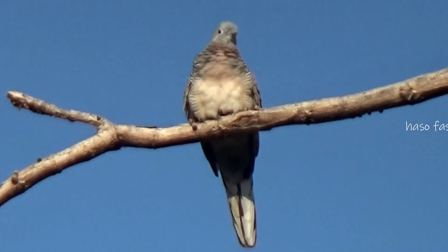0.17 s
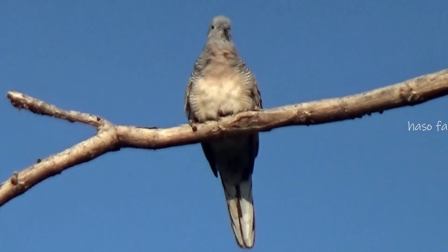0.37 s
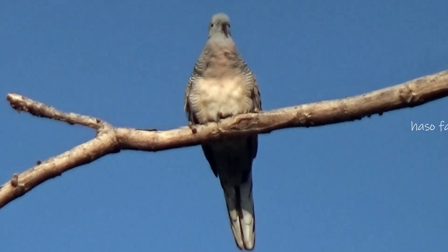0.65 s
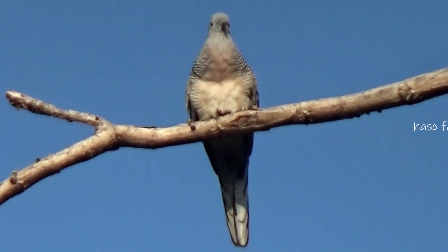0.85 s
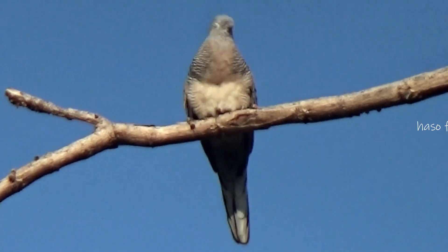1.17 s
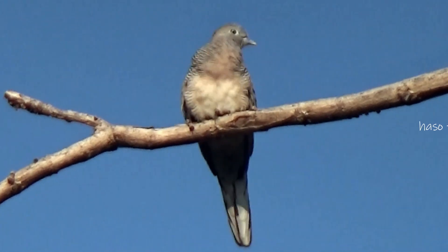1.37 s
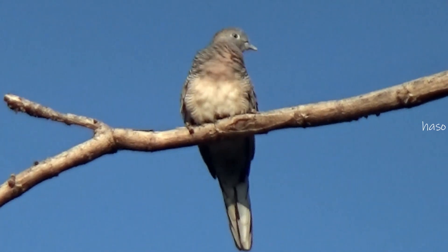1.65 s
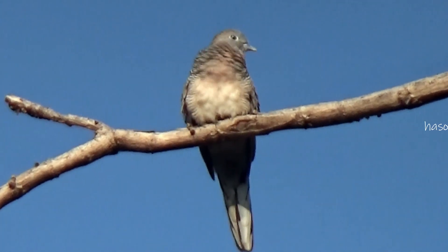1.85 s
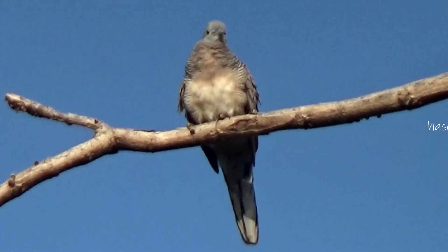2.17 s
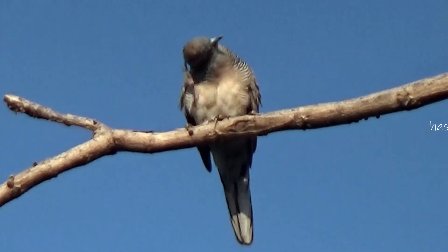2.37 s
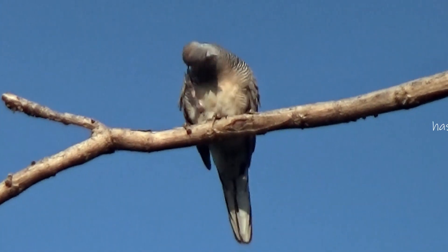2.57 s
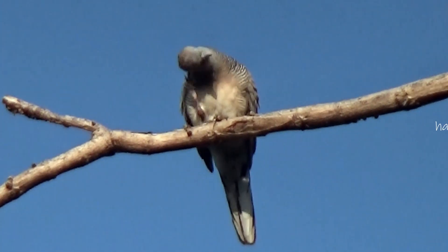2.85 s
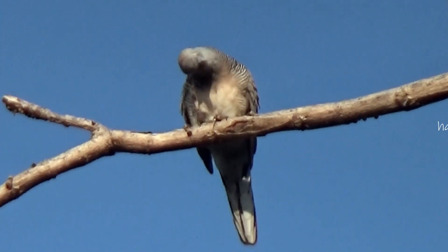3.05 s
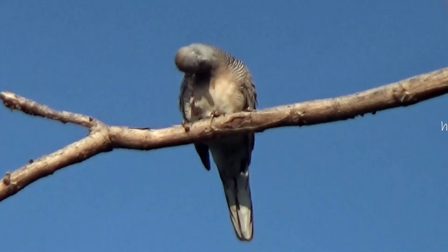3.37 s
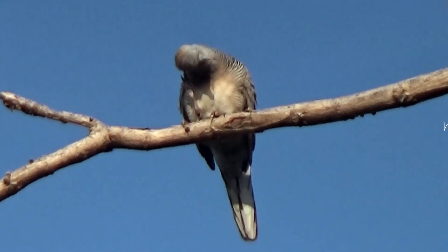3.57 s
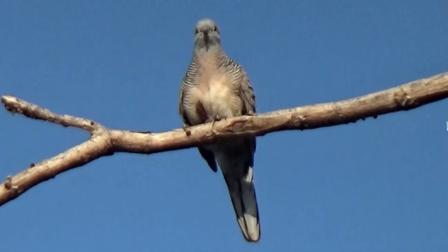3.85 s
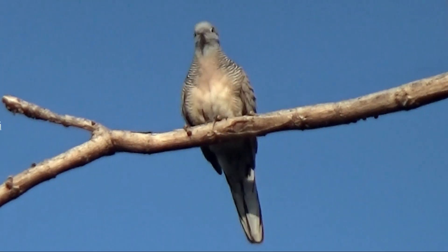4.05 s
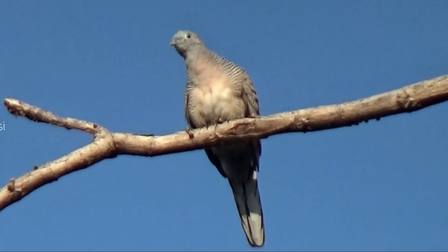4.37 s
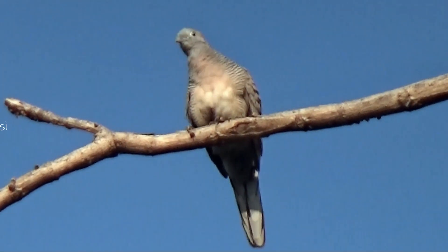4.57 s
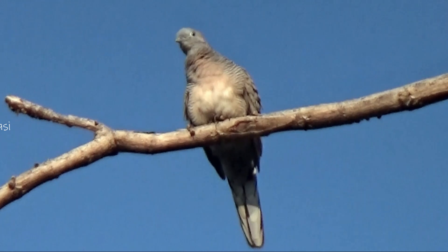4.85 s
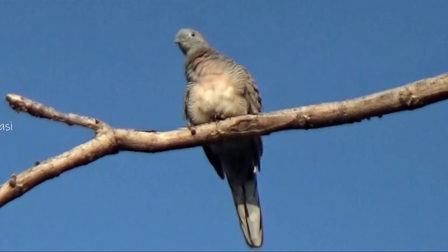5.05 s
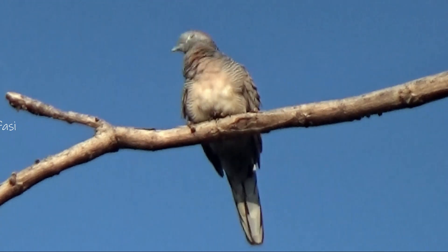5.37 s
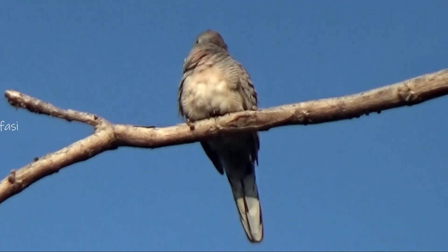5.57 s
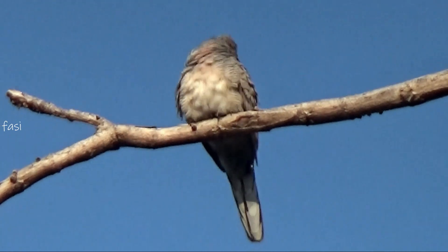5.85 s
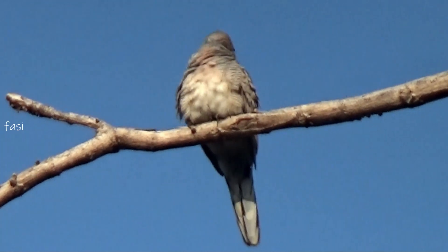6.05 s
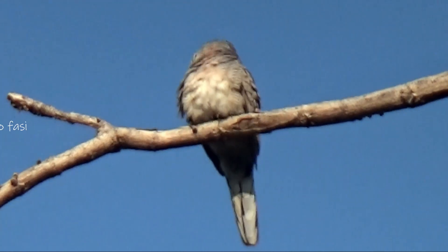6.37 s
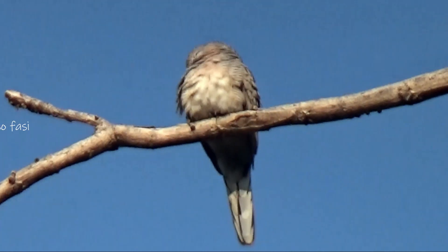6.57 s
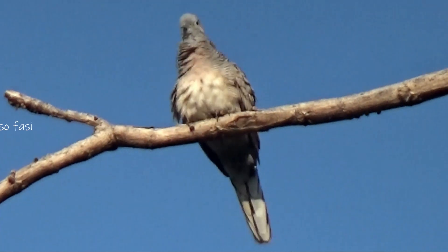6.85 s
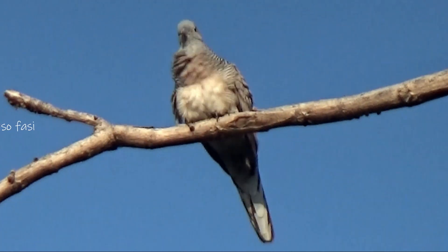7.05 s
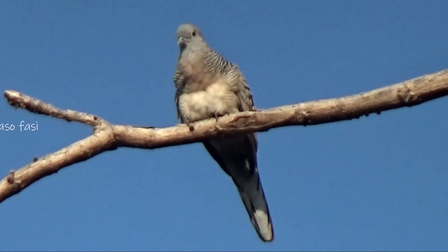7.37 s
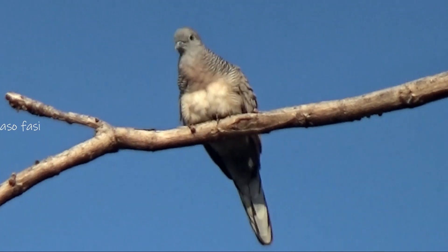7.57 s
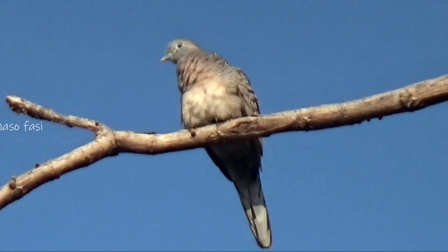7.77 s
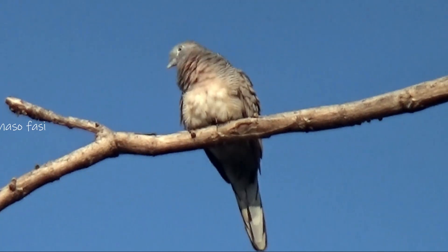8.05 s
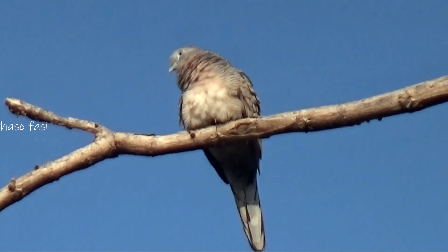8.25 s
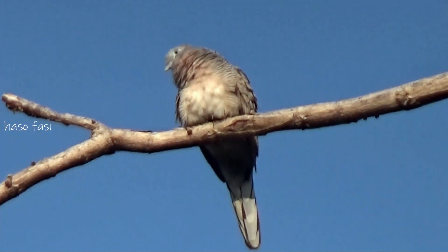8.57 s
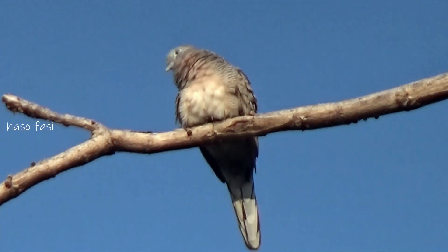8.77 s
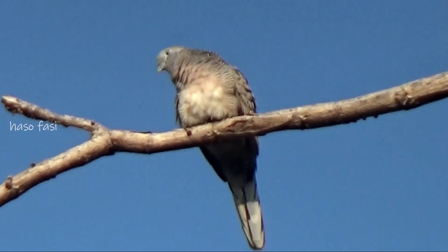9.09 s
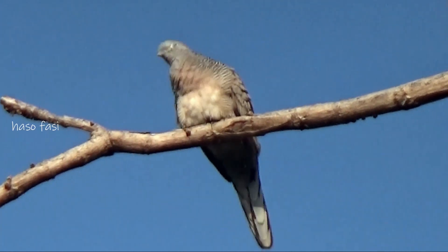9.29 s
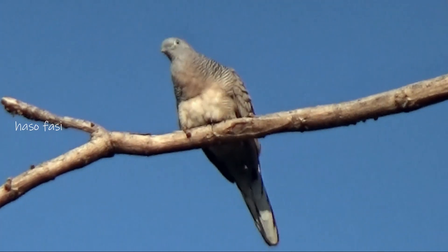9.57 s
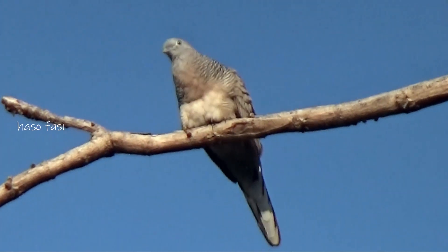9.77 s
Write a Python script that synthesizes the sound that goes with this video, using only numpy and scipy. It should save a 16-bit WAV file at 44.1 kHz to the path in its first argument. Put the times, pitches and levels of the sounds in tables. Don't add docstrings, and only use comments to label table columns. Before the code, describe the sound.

An outdoor morning-like ambience: low, soft traffic rumble, a faint engine hum and a hazy treble of distant flock twitter throughout. Hoarse, breathy nestling rasps repeat several times a second, weaker around 5.5-6.5 s and stronger after 7. At 0.7 s a close dove gives a dry, hollow, trilled coo of nine rapid puffs around 1-1.3 kHz, slowing and sinking into a longer last note, about half a second in all. Sharp 7 kHz bird chips pepper the whole scene, with a falling slide at 2.3 and a rising one at 6.1. Weak far barks come near 2.7 and 3.2. A distant dove answers at 5.7, softly echoed. The near dove repeats at 7.0; a bright far yap and faint cock crow follow around 7.5-8.5. Four arched chirps run from 7.9 to 8.9 over the second far answer at 8.0. The third near coo comes at 9.2, with a faint gliding song until the end.

```python
import sys
import numpy as np
from scipy import signal
from scipy.fft import rfft, irfft
from scipy.io import wavfile
from scipy.ndimage import uniform_filter1d

SR = 44100
rng = np.random.default_rng(int(sys.argv[2]) if len(sys.argv) > 2 else 0)


def inscribe(sig):
    pcm = np.round(np.clip(np.atleast_2d(sig).T, -1, 1) * 32767)
    wavfile.write(sys.argv[1], SR, pcm.astype(np.int16))


def natural_amplitude(level_db):
    exponent = np.asarray(level_db, float) / 20
    return 10 ** exponent


N = 437472

# frequency in Hz, density in dB per Hz.
AIR_SPECTRUM = [(18, -54), (30, 2.5), (127, 0), (263, -8.5), (481, -12), (877, -12.5), (1370, -16),
                (2370, -17.5), (3330, -11.5), (3900, -13), (5920, -18), (6750, -22), (9000, -22.5),
                (12500, -36), (15600, -36)]
AIR_DB = -42.5
# time in seconds, level in dB.
FLOCK_SWELL = [(0.0, -43.5), (0.38, -43), (0.72, -43.5), (1.1, -45), (1.35, -44.5), (2.51, -43),
               (2.68, -46.5), (4.39, -42.5), (5.14, -48), (6.66, -43.5), (6.9, -40.5), (8.07, -40.5),
               (8.56, -41.5), (9.92, -42)]
# pitch in Hz, width in Hz, level in dB.
ENGINE = (133, 3.5, -54)
# frequency in Hz, left-right likeness from 0 to 1.
LIKENESS = [(60, .999), (125, 1), (250, 0.9), (700, 0.32), (2000, 0.61), (4000, 0.84), (8000, 0.96),
            (12000, .999)]
# frequency in Hz, time to die by 60 dB in seconds.
TREE_DECAY = [(800, 0.39), (3000, 0.22), (7000, 0.26), (12000, 0.038)]

# start in seconds, level in dB, throat in Hz, throat width in Hz, decay in seconds.
BARK_CALLS = [
    (2.694, -44, 820, 600, 0.1),
    (3.202, -47.5, 785, 600, 0.082),
    (6.322, -47.5, 1370, 350, 0.14),
    (6.604, -51, 420, 300, 0.12),
    (7.549, -39.5, 2020, 400, 0.037),
    (7.54, -41, 2700, 500, 0.066),
]
# time in seconds, frequency in Hz, level in dB.
COCK_CURVE = [
    (7.71, 710, -55),
    (7.726, 679.6, -55),
    (8.352, 602.4, -58.5),
    (8.58, 630, -61),
]
# start and length in seconds, level in dB, middle pitch and whole glide in Hz.
FAR_WHISTLES = [(0, 0.3, -50, 2620, -150), (1.618, 0.15, -52.5, 2180, -450), (2.159, 0.065, -52, 2387, -70),
                (2.419, 0.064, -50, 1270, 5), (2.494, 0.045, -66, 1250, -5), (2.39, .06, -51, 2665, -30),
                (2.725, 0.12, -50, 2524, -400), (4.05, 0.058, -52.5, 1150, -40),
                (4.797, 0.061, -54, 2370, 15), (4.953, 0.25, -55, 2250, 17), (6.465, 0.036, -48, 1420, 50),
                (6.617, 0.047, -48, 1345, -110), (8.333, 0.14, -40, 3294, -150),
                (6.232, 0.036, -47, 4330, 0), (8.79, 0.079, -44, 2800, 38),
                (8.939, 0.073, -39.5, 3050, 100)]
# time in seconds, pitch in Hz, level in dB.
FAR_SONG = [(9.26, 2670, -40), (9.31, 2740, -48), (9.38, 3020, -48.5), (9.47, 2980, -48), (9.55, 2760, -57),
            (9.62, 2795, -47), (9.76, 2710, -48), (9.82, 2660, -58), (9.9, 2590, -48)]

# time in seconds, pitch in Hz, level in dB.
SLIDE_CURVES = [
    [(2.251, 8860, -31), (2.258, 7630, -34), (2.284, 6540, -28.5), (2.305, 6100, -39), (2.335, 5200, -50)],
    [(3.872, 7600, -36), (3.884, 6850, -35), (3.945, 4900, -50)],
    [(6.085, 4780, -44), (6.118, 4750, -47), (6.136, 5020, -36), (6.19, 6390, -32.5), (6.222, 7280, -30),
     (6.242, 7550, -43.5)],
    [(6.128, 7430, -41), (6.15, 7250, -52), (6.18, 6950, -42)],
    [(6.408, 7360, -41), (6.44, 7180, -44), (6.47, 7080, -55)],
]
# start in seconds, peak in dB, pitch in Hz, level change per flick in dB.
CHIP_CALLS = [(0.676, -25, 7260, -4.5), (0.8706, -29, 7400, 3), (0.9857, -22.5, 7200, -7),
              (1.2688, -21.5, 7320, -7), (1.91, -25.5, 7040, -1.5), (2.205, -28, 6560, -3),
              (2.501, -28.5, 7030, -4), (3.6614, -30, 6900, -4.5), (3.7976, -26.5, 7420, -7.5),
              (4.0603, -26.5, 6900, -6), (4.4209, -28.5, 7360, -2), (4.5176, -26, 7460, -4.5),
              (4.6877, -27.5, 7500, -6), (4.823, -29.5, 7620, -3.5), (5.3095, -30, 7560, -4),
              (5.7103, -34.5, 7600, 0), (5.961, -32, 7350, -1.5), (6.784, -30, 7440, -3.5),
              (7.187, -28.5, 7400, -6), (7.8826, -32.5, 7200, 1.2), (7.989, -34, 7750, -15),
              (8.001, -22.5, 7840, -10), (8.321, -27.5, 7020, -4.5), (8.593, -31, 6700, -0.6),
              (9.084, -29.5, 6680, 0.2), (9.485, -30.5, 6280, -3)]
CHIP_FALL, CHIP_DEPTH = .05, .26
CHIP_GAP_S = .0135
# start in seconds, level in dB, top pitch in Hz.
ARCH_CALLS = [
    (7.926, -22, 3850),
    (8.258, -22, 3735),
    (8.574, -21, 3690),
    (8.869, -19.5, 3655),
]
ARCH_RISE_S, ARCH_FALL_S = .031, .027
ARCH_START_HZ, ARCH_END_HZ, ARCH_EDGE_DB = 2620, 2834, -4.5

# middle in seconds, length in seconds, breath in dB.
HOARSE_CALLS = [(0.245, 0.14, -50.5), (0.382, 0.12, -45.5), (0.995, 0.089, -48), (1.446, 0.2, -52),
                (1.768, 0.15, -48), (2.322, 0.12, -48.5), (2.622, 0.057, -57), (2.91, 0.033, -58),
                (3.037, 0.067, -56.5), (3.15, 0.17, -53), (4.477, 0.17, -48.5), (4.903, 0.087, -51.5),
                (5.064, 0.099, -62), (5.23, .09, -59), (2.76, .05, -63.5), (3.277, .06, -60),
                (5.836, 0.075, -58), (5.963, 0.088, -60), (6.368, 0.068, -59), (6.712, 0.12, -48),
                (6.912, 0.25, -49.5), (7.093, 0.12, -44.5), (7.261, 0.16, -44), (7.477, 0.11, -45),
                (7.627, 0.099, -52.5), (7.744, 0.1, -44), (7.942, 0.12, -44.5), (8.304, 0.12, -45.5),
                (8.742, 0.095, -48.5), (8.859, 0.19, -50.5), (9.241, 0.13, -46.5), (9.51, 0.1, -45),
                (9.815, 0.12, -50.5)]
# middle in seconds, length in seconds, breath in dB.
BREATHY_CALLS = [(0.115, 0.097, -49.5), (0.552, 0.13, -46.5), (0.695, 0.048, -49.5), (0.812, 0.075, -53),
                 (0.894, 0.041, -54), (1.269, 0.2, -50), (1.61, 0.12, -50.5), (1.935, 0.16, -50),
                 (2.108, 0.15, -57), (2.23, 0.011, -62), (2.467, 0.094, -49.5), (3.38, 0.11, -52.5),
                 (3.627, 0.12, -56.5), (3.826, 0.12, -51), (4.075, 0.12, -51), (4.297, 0.09, -50),
                 (4.693, 0.071, -48), (5.442, 0.077, -50.5), (5.717, .071, -60), (6.155, 0.065, -57),
                 (6.587, 0.049, -59), (8.061, 0.13, -43.5), (8.49, 0.16, -47.5), (8.648, 0.086, -48.5),
                 (9.023, 0.093, -44.5), (9.657, 0.13, -46.5)]
HOARSE_VOICE_DB, BREATHY_VOICE_DB = 9, 8
RASP_HZ = 1922
# multiple of the pitch, level in dB.
RASP_PARTIALS = [(1, -8.5), (2, 3), (3, 5), (5, -23)]
# frequency in Hz, density in dB per Hz.
RASP_BREATH = [(940, -48), (1600, -11.5), (3020, -9.5), (3890, 0.5), (4570, -5.5), (5210, -1), (5720, -5.5),
               (7090, -16.5), (8390, -11), (10400, -11.5), (11900, -29), (15000, -38)]

# puff start in seconds, peak in dB.
FAR_DOVE_PUFFS = [
    [(5.703, -33), (5.73, -30.5), (5.773, -29.5), (5.803, -30.5), (5.84, -30.5), (5.888, -31.5),
     (5.95, -34), (6.037, -30.5)],
    [(8.018, -36.5), (8.044, -33), (8.086, -32), (8.13, -34), (8.175, -34.5), (8.226, -31.5), (8.308, -33),
     (8.424, -34.5)],
]
# puff length in seconds, start pitch in Hz, top pitch in Hz.
FAR_DOVE_SHAPE = [(0.03, 940, 1008), (0.026, 1160, 1230), (0.026, 1060, 1225), (0.031, 1070, 1228),
                  (0.033, 1020, 1195), (0.034, 965, 1168), (0.032, 964, 1130), (0.086, 985, 1160)]
FAR_SPAN_S = .37
HEDGE_S, HEDGE_DB = .04, -13
WALL_S, WALL_DB = .112, -19

# puff start in seconds, peak in dB.
DOVE_PUFFS = [
    [(0.664, -6), (0.688, -6), (0.72, -6.5), (0.751, -7), (0.7805, -7.5), (0.8252, -7.5), (0.888, -9),
     (0.963, -10), (1.056, -12)],
    [(7.008, -6), (7.031, -6.5), (7.069, -7.5), (7.1, -7.5), (7.132, -8.5), (7.182, -7.5), (7.244, -9.5),
     (7.323, -10), (7.418, -10.5)],
    [(9.244, -6), (9.267, -8), (9.3, -9.3), (9.332, -8.5), (9.3575, -7.5), (9.403, -9), (9.464, -9),
     (9.538, -8.5), (9.625, -10)],
]
# puff length in seconds, start pitch in Hz, top pitch in Hz.
DOVE_SHAPE = [
    (0.024, 925, 990),
    (0.03, 1225, 1320),
    (0.033, 1250, 1325),
    (0.0281, 1250, 1320),
    (0.0366, 1090, 1285),
    (0.033, 960, 1222),
    (0.027, 965, 1192),
    (0.031, 990, 1215),
    (0.1, 990, 1235),
]


def evened(x):
    return x / np.sqrt(np.mean(x ** 2) + 1e-20)


def read(points, hz):
    f, value = np.transpose(points)
    return np.interp(np.log(hz + 1), np.log(f + 1), value)


def add(mix, s, sound):
    part = mix[max(round(s * SR), 0):][:len(sound)]
    part += sound[:len(part)]


def wander(size, seconds):
    span = max(round(seconds * SR), 1)
    once = uniform_filter1d(rng.standard_normal(size), span)
    return evened(uniform_filter1d(once, span))


def sine(hz):
    return np.sin(2 * np.pi * np.cumsum(hz) / SR)


def resonate(x, hz, width):
    turn = np.exp(2j * np.pi * np.cumsum(hz * np.ones(len(x))) / SR)
    r = np.exp(-np.pi * width / SR)
    return 2 * (turn * signal.lfilter([1 - r], [1, -r], x / turn)).real


def hiss(spectrum, patchy_db):
    frames, hz = N // 256 + 5, np.fft.rfftfreq(1024, 1 / SR)
    a, b, c, d, patches = rng.standard_normal((frames, 513, 5)).T
    patches = evened(uniform_filter1d(uniform_filter1d(patches, 10, 0), 8, 1))
    mid = a + 1j * b
    width = np.sqrt((1 - np.clip(read(LIKENESS, hz), 0, 1)) / 2)
    side = width[:, None] * (c + 1j * d)
    gain = natural_amplitude(read(spectrum, hz)[:, None] + patchy_db * patches)
    z = np.array([mid + side, mid - side]) * gain
    return evened(signal.istft(z, nperseg=1024, noverlap=768)[1][:, :N])


def trees(x, wet_db):
    taps = np.zeros((2, SR // 2))
    at = np.arange(300, SR // 2 - 20, 20) + rng.integers(0, 20, (2, (SR // 2 - 301) // 20))
    np.put_along_axis(taps, at, rng.choice([-1., 1.], at.shape), 1)
    hz, t, z = signal.stft(taps, SR, nperseg=256)
    decay = natural_amplitude(-60 * t / read(TREE_DECAY, hz)[:, None])
    mid, side = signal.istft(z * decay, SR, nperseg=256)[1]
    tail = np.array([mid + 0.23 * side, mid - 0.3 * side]) / np.linalg.norm(mid)
    return x + natural_amplitude(wet_db) * signal.fftconvolve(x[None], tail, axes=1)[:, :N]


def traffic_and_flock():
    air = rfft(natural_amplitude(AIR_DB) * hiss(AIR_SPECTRUM, patchy_db=.7))
    hz = np.fft.rfftfreq(N, 1 / SR)
    high = 1 / (1 + (2750 / (hz + 1)) ** 12) / (1 + (hz / 9000) ** 4)
    swell_db = np.interp(np.arange(N) / SR, *np.transpose(FLOCK_SWELL)) + 47
    swell_db += 3.2 * wander(N, 0.043)
    return irfft(air * (1 - high), N) + natural_amplitude(swell_db) * irfft(air * high, N)


def engine_hum():
    hz, width, db = ENGINE
    return natural_amplitude(db) * evened(resonate(rng.standard_normal(N), hz, width))


def bark(s, db, hz, width, length):
    t = np.arange(0, 3 * length, 1 / SR)
    puff = rng.standard_normal(len(t))
    throat = resonate(resonate(puff, hz, width), hz, width)
    throat += 0.4 * resonate(puff, 1.49 * hz, width)
    return s, natural_amplitude(db) * evened(throat) * np.clip(t / 0.004, 0, 1) * np.exp(-t / length)


def crow(rows):
    s, hz, db = np.transpose(rows)
    t = np.arange(s[0], s[-1], 1 / SR)
    shaky_hz = np.interp(t, s, hz) * (1 + 0.0068 * wander(len(t), 0.0039))
    turns = np.pi * np.cumsum(shaky_hz) / SR
    edges = np.exp(-(t - s[0]) / 0.074)
    broken = np.clip(.6 + .45 * wander(len(t), .012), edges, 2)
    tone = np.sin(2 * turns) + edges * (1.4 * np.sin(turns) + 1.6 * np.sin(3 * turns))
    return s[0], natural_amplitude(np.interp(t, s, db) + 5.5) * broken * tone


def whistle(s, length, db, middle_hz, glide_hz, rough=0.6):
    u = np.arange(0, 1, 1 / SR / length)
    bend = .5 - .5 * np.cos(2 * np.pi * u)
    hz = middle_hz + np.where(u < .5, -glide_hz / 2, glide_hz / 2) * (1 - bend)
    hz = hz * (1 + 0.02 * rough * wander(len(u), 0.0035))
    level = natural_amplitude(db) * (1 + rough * wander(len(u), 0.011)) * signal.windows.tukey(len(u), .3)
    return s, level * sine(hz)


def slide(rows, flutter_s=0.0023):
    s, hz, db = np.transpose(rows)
    t = np.arange(s[0], s[-1], 1 / SR)
    flutter = np.clip(1 + .65 * wander(len(t), flutter_s), 0, 2)
    level = natural_amplitude(np.interp(t, s, db) + 3) * flutter * signal.windows.tukey(len(t), .1)
    return s[0], level * sine(uniform_filter1d(np.interp(t, s, hz), 250))


def chip(s, db, hz, change_db):
    t, out = np.arange(0, .007, 1 / SR), np.zeros(SR // 20)
    for k in range(3):
        arch = 1.02 - CHIP_DEPTH * (2 * t / t[-1] - .9) ** 2
        flick = np.sin(np.pi * (t / t[-1]) ** 0.66) * sine(hz * (1 - CHIP_FALL * k) * arch)
        click = resonate(resonate(rng.standard_normal(len(t)), 7500, 2400), 7500, 2400)
        click *= 0.92 * np.exp(-t / 0.0088)
        add(out, k * CHIP_GAP_S, natural_amplitude(db + change_db * k) * (flick + click))
    return s - .0015, out


def chirp(s, db, top_hz):
    t = np.arange(0, ARCH_RISE_S + ARCH_FALL_S, 1 / SR)
    corners = [0, ARCH_RISE_S, t[-1]]
    hz = np.interp(t, corners, [ARCH_START_HZ, 1.045 * top_hz, ARCH_END_HZ])
    hz = uniform_filter1d(hz, size=560, mode="nearest")
    level = natural_amplitude(db + np.interp(t, corners, [ARCH_EDGE_DB, 0, .15 * ARCH_EDGE_DB]))
    level *= 1 + 0.41 * wander(len(t), 0.0054)
    return s, level * signal.windows.tukey(len(t), .3) * sine(hz)


def nestlings():
    breath, voice, bend = np.zeros((3, N))
    calls = [(*row, HOARSE_VOICE_DB) for row in HOARSE_CALLS]
    calls += [(*row, BREATHY_VOICE_DB) for row in BREATHY_CALLS]
    for s, length, breath_db, voice_db in calls:
        u = np.linspace(0, 1, round(1.27 * length * SR))
        swell = np.clip(u / 0.28, 0, 1) ** 1.1 * np.clip((1 - u) / 0.37, 0, 1) ** 1.53
        add(breath, s - 0.61 * length, natural_amplitude(breath_db) * swell)
        add(voice, s - 0.68 * length, natural_amplitude(breath_db + voice_db) * swell ** 2)
        add(bend, s - 0.4 * length, swell * rng.normal(0.005, 0.018))
    hz = RASP_HZ * (1 + bend + .014 * wander(N, .015))
    grit = natural_amplitude(2.3 * wander(N, .0015))
    noise = rng.standard_normal(N)
    hoarse = np.zeros(N)
    for k, db in RASP_PARTIALS:
        hoarse += natural_amplitude(db) * evened(resonate(resonate(noise, k * hz, 260), k * hz, 340))
    air = natural_amplitude(10.0) * breath * hiss(RASP_BREATH, patchy_db=4.0)
    return grit * air + trees(natural_amplitude(-6.5) * grit * voice * evened(hoarse), wet_db=-0.5)


def coo(rows):
    t = np.arange(rows[0][0] - .03, rows[-1][0] + rows[-1][1] + .012, 1 / SR)
    hz = np.full(len(t), float(rows[0][3]))
    level, sputter, shut = np.zeros(len(t)), np.zeros(len(t)), -1
    following = [*rows[1:], [99] * 5]
    for k, ((s, length, db, low_hz, top_hz), (next_s, _, _, next_hz, _)) in enumerate(zip(rows, following)):
        joined, slurred, rested = next_hz > 1150, low_hz > 1150, s - shut > .015
        length = next_s - s if joined else min(length, next_s - s - .0015)
        u, left = t - s, s + length - t

        end_hz = next_hz if joined else (.95 - 1.2 * length) * top_hz
        rise_s = .004 + .05 * length + .003 * slurred
        rise = 1 - np.exp(-(np.maximum(u - .001 - .002 * rested, 0) / rise_s) ** 1.5)
        fall = np.exp(-np.maximum(left, 0) / (.003 if joined else .001 + .2 * length))
        arch = low_hz + (top_hz - low_hz) * rise - (top_hz - end_hz) * fall * rise
        hz = np.where(u > -.004 * rested, arch, hz)

        lap = (.0048 - 0.0019 * k - .0055) * joined
        opening = (u + 0.00055) / 0.007 if rested else (u + 0.0014 + 0.0045 * slurred) / 0.0067
        closing = (left + lap) / (.008 if joined else .004 + 0.16 * length)
        valve = (np.clip(opening, 0, 1) * np.clip(closing, 0, 1)) ** 0.64
        tilt_db = .9 if k == 1 else 0.5 * (not joined)
        level += valve * natural_amplitude(db - tilt_db * (2 * u / length - 1).clip(-1, 1))
        if rested:
            burst = np.clip((u + 0.017) / 0.0099, 0, 1) * np.clip(-u / 0.0036, 0, 1)
            sputter += burst * natural_amplitude(db - (14.0 if k == 0 else 17.0))
        shut = s + length

    level = uniform_filter1d(level, size=170)
    crop = .75 * np.exp(-((hz - 1010) / 70) ** 2) - .22 * np.exp(-((hz - 1120) / 35) ** 2)
    level *= 1 + crop * np.clip((t - rows[4][0] - .02) / .08, 0, 1)
    level *= 1 + 0.062 * wander(len(t), 0.0017)
    turns = 2 * np.pi * np.cumsum(hz * (1 + 0.0037 * wander(len(t), 0.0028))) / SR
    overtone = natural_amplitude(-36) * np.where(t > rows[-1][0] + .012, 1, .45) * np.sin(2 * turns)
    flaps = rng.standard_normal(len(t))
    for _ in range(4):
        flaps = evened(resonate(flaps, 982, 780))
    return t[0], level * (np.sin(turns) + overtone) + sputter * flaps


def phrase(puffs, shape, pace=1):
    rows = []
    for (s, db), (length, low_hz, top_hz) in zip(puffs, shape):
        rows.append((s, pace * length, db, low_hz, top_hz))
    return coo(rows)


def far_dove():
    answer = np.zeros(N)
    for puffs in FAR_DOVE_PUFFS:
        s, call = phrase(puffs, FAR_DOVE_SHAPE, (puffs[-1][0] - puffs[0][0]) / FAR_SPAN_S)
        add(answer, s, call)
        add(answer, s + HEDGE_S, natural_amplitude(HEDGE_DB) * call)
        add(answer, s + WALL_S, natural_amplitude(WALL_DB) * call)
    return resonate(answer, 1030, 460)


def near_dove():
    near = np.zeros(N)
    for puffs in DOVE_PUFFS:
        add(near, *phrase(puffs, DOVE_SHAPE))
    return near


def scene():
    far, small, chirps = np.zeros((3, N))
    for row in BARK_CALLS:
        add(far, *bark(*row))
    add(far, *crow(COCK_CURVE))
    for row in FAR_WHISTLES:
        add(far, *whistle(*row))
    add(far, *slide(FAR_SONG, flutter_s=0.0077))
    for rows in SLIDE_CURVES:
        add(small, *slide(rows))
    for row in CHIP_CALLS:
        add(small, *chip(*row))
    for row in ARCH_CALLS:
        add(chirps, *chirp(*row))
    birds = trees(far, wet_db=-3.0) + trees(small, wet_db=-3)
    birds += trees(chirps, wet_db=-7.5) * natural_amplitude([[-1], [1]])
    birds += trees(far_dove(), wet_db=-9.0) + trees(near_dove(), wet_db=-40.0)
    return traffic_and_flock() + engine_hum() + nestlings() + birds


def band_limit(x):
    return signal.sosfilt(signal.butter(12, 15750, fs=SR, output="sos"), x)


def record(dry):
    fade = np.clip((N - np.arange(N)) / (0.027 * SR), 0, 1)
    treble_limit = signal.firwin(401, 15550, window=("kaiser", 9), fs=SR)
    rumble_cut = signal.butter(2, 34, "high", fs=SR, output="sos")
    mix = signal.sosfilt(rumble_cut, dry) * fade
    return band_limit(signal.oaconvolve(mix, treble_limit[None], "same"))


dry = scene()
out = record(dry)
inscribe(out)
```